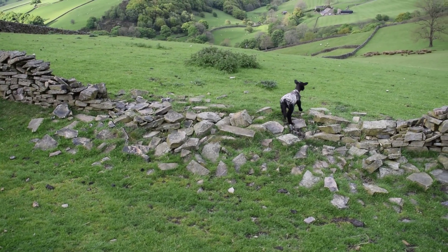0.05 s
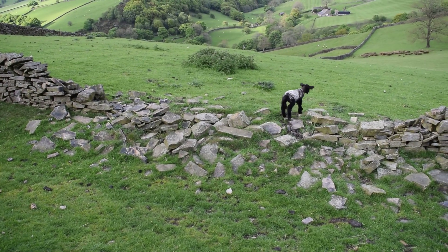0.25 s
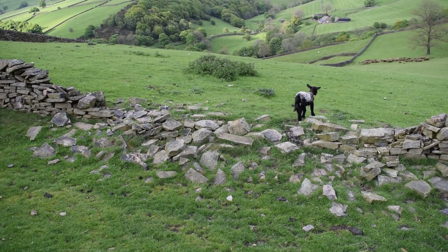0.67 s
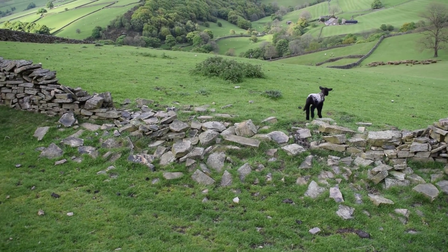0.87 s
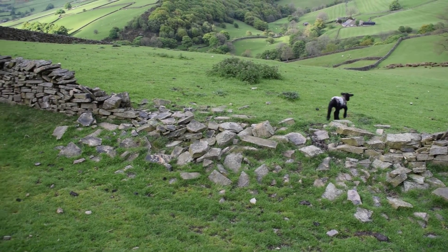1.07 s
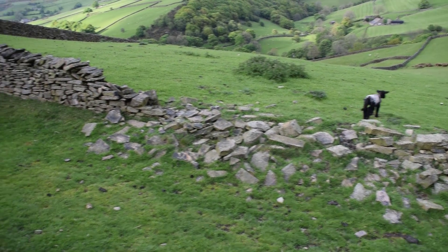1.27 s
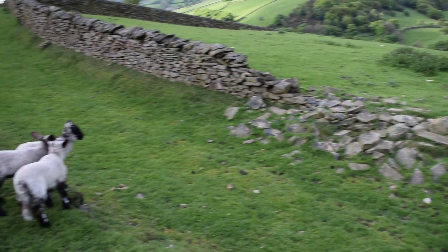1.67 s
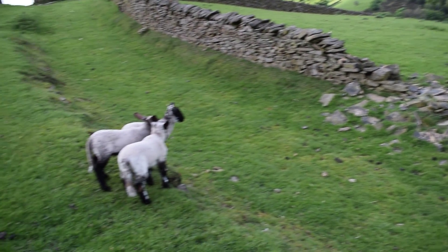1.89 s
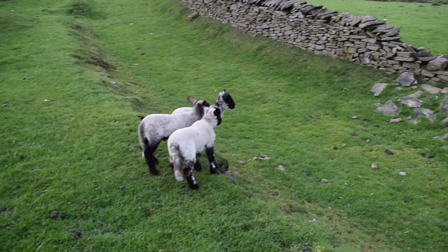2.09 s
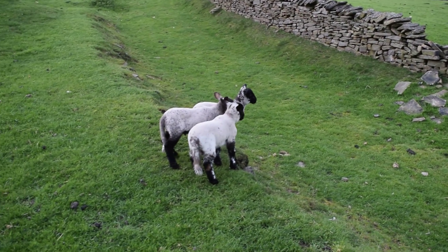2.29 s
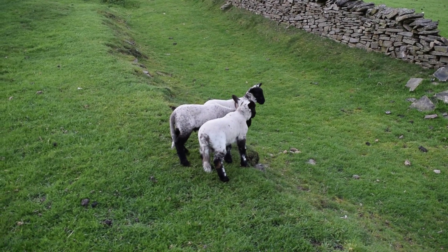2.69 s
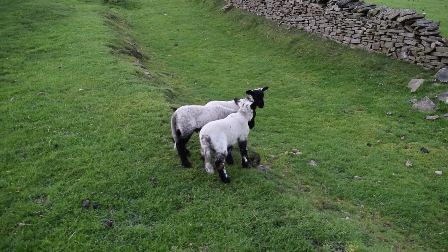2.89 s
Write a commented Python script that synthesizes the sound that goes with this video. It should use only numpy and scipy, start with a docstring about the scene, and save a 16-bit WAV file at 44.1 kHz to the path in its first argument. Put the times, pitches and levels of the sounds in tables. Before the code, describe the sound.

A lamb bleats close by, then sheep call farther off, as wind buffets the microphone.

```python
"""A lamb bleats close by on a windy hill pasture; a ewe and a second lamb call from farther off.
Each voice is a source and a filter: vocal-fold pulses and breath noise, shaped by throat resonances.
Turbulent pressure rumbles and thumps on the microphone and overloads it now and then.
Under a soft hiss of air, grass rustles, a bird whistles once and the camera case clicks in the hand.
A low hum rises at the end."""
import sys
import numpy as np
from scipy import signal
from scipy.fft import rfft, irfft
from scipy.io import wavfile
from scipy.ndimage import uniform_filter1d

SR = 44100
rng = np.random.default_rng(int(sys.argv[2]) if len(sys.argv) > 2 else 0)


def int16_out(signal):
    """Quantize to a 16-bit WAV file."""
    q = np.round(np.clip(np.atleast_2d(signal).T, -1, 1) * 32767)
    wavfile.write(sys.argv[1], SR, q.astype(np.int16))


N = 134505
TIME = np.arange(N) / SR
TOP_HZ = 15900  # upper limit of the voices' harmonics and of the passband


def undb(db):
    """Amplitude ratio of a level in decibels."""
    return 10 ** (np.asarray(db) / 20)


def unit(x):
    """Normalisation to rms 1."""
    return x / np.sqrt(np.mean(x ** 2) + 1e-20)


def curve(table, column=1):
    """Linear interpolation of one column in time."""
    rows = np.array(table)
    return np.interp(TIME, rows[:, 0], rows[:, column])


def envelope(table, column=2):
    """Gain from a level column, with exponential decay outside the table's time span."""
    outside = np.maximum(table[0][0] - TIME, 0) + np.maximum(TIME - table[-1][0], 0)
    return undb(curve(table, column)) * np.exp(-outside / .01)


def colour(x, points):
    """Zero-phase filtering through (f/Hz, gain/dB) points."""
    hz, db = np.array(points).T
    f = np.arange(N + 1) * SR / (2 * N)
    gain = undb(np.interp(np.log(f + 1), np.log(hz), db))
    return irfft(rfft(x, 2 * N) * gain)[:N]


def walk(rate_hz):
    """Smooth random modulation of rms 1."""
    k = max(int(SR / rate_hz), 2)
    steps = np.repeat(rng.standard_normal(N // k + 1), k)
    return unit(uniform_filter1d(uniform_filter1d(steps, k), k)[:N])


def larynx(hz, jitter, rasp_db, shimmer=.2, mouth=lambda f: 1):
    """Phonation: nearly periodic vocal-fold pulses give harmonics, with a puff of air in every cycle."""
    phase = 2 * np.pi * np.cumsum(hz * (1 + jitter * walk(300))) / SR
    flutter, wobble = undb(2.4 * walk(49.95)), walk(110)
    pulses = np.zeros(N)
    for k in range(1, 35):  # random time shifts let each harmonic waver separately
        gain = mouth(k * hz) * (k * hz < TOP_HZ) * np.roll(flutter, rng.integers(N))
        offset = .57 * rng.standard_normal() + .059 * k * np.roll(wobble, rng.integers(N))
        pulses += gain * np.cos(k * phase + offset)
    puffs = unit(rng.standard_normal(N) * (1 + np.cos(phase)))
    return unit(pulses) * (1 + shimmer * walk(120)) + undb(rasp_db) * puffs


def bleat(voice, levels, splits_hz):
    """Time-varying filtering: low, middle and high bands swell separately as the mouth opens."""
    lowpasses = (signal.butter(8, hz, fs=SR, output='sos') for hz in splits_hz)
    low, low_mid = (signal.sosfiltfilt(sos, voice) for sos in lowpasses)
    bands = (low, low_mid - low, voice - low_mid)
    steady = (x / np.sqrt(uniform_filter1d(x ** 2, size=1200) + 1e-12) for x in bands)
    return sum(x * envelope(levels, column) for column, x in enumerate(steady, 1))


def formant(f, centre_hz, half_width_hz):
    """Resonance peak of Lorentzian shape and height 1."""
    return 1 / (1 + ((f - centre_hz) / half_width_hz) ** 2)


# The close bleat: t/s, low-band level/dB, middle-band level/dB, high-band level/dB
NEAR_LEVELS = [
    (0.0, -49, -51, -61), (0.036, -53.5, -53, -67), (0.076, -37.5, -46, -51.5), (0.124, -45, -43.5, -54),
    (0.148, -33.5, -34, -46), (0.2, -43.5, -37.5, -46.5), (0.218, -35, -42, -54.5),
    (0.232, -43.5, -39, -48.5), (0.266, -37.5, -44.5, -58.5), (0.28, -31.5, -36, -50.5),
    (0.322, -41, -43.5, -64), (0.358, -34.5, -42, -61.5), (0.374, -49.5, -44.5, -59.5),
    (0.388, -43, -49, -60), (0.402, -40.5, -43.5, -59.5), (0.412, -46.5, -55, -69.5),
    (0.432, -38, -45, -59), (0.45, -38, -48, -60.5), (0.468, -61.5, -59.5, -67.5),
    (0.48, -52.5, -61.5, -70.5)]
# Fundamental, mouth formant and upper throat formant: t/s, f/Hz
NEAR_PITCH = [(0.0, 338.6), (0.032, 342.1), (0.08, 357.9), (0.118, 332.0), (0.14, 353.6), (0.15, 370.7),
              (0.19, 353.1), (0.21, 367.4), (0.232, 354.0), (0.28, 370.9), (0.304, 354.8), (0.328, 363.0),
              (0.34, 374.9), (0.35, 367.6), (0.386, 322.0), (0.412, 350.0), (0.428, 360.8), (0.46, 319.8)]
MOUTH_FORMANT = [(0, 1790), (.08, 1840), (.11, 1490), (.15, 1620), (.19, 1690), (.24, 1400), (.33, 1420),
                 (.39, 1440), (.42, 1645), (.45, 1392)]
UPPER_FORMANT = [(0, 2880), (.07, 2900), (.1, 3850), (.14, 3900), (.17, 4250), (.2, 4040), (.225, 3300),
                 (.28, 3010), (.35, 2950), (.45, 3000)]
# Throat response: f/Hz, gain/dB
NEAR_THROAT = [(350, -1), (720, -8.5), (1090, 0), (1450, -5), (1800, -6.5), (2170, -9.5), (2520, -8),
               (2920, 3.5), (3280, -1), (3600, -4), (3980, -0.5), (4600, -10), (5200, -8), (5800, -17),
               (6500, -18.5), (8000, -23), (10500, -29), (12500, -42.5), (16000, -46.5)]


def near_lamb():
    """Source and filter: two moving formants shape the harmonics of a quavering bleat."""
    lower, upper = curve(MOUTH_FORMANT), curve(UPPER_FORMANT)
    mouth = lambda f: 1 + undb(14) * formant(f, lower, 190) + undb(-5) * formant(f, upper, 120)
    source = larynx(curve(NEAR_PITCH), jitter=.006, rasp_db=-16, shimmer=.18, mouth=mouth)
    return bleat(colour(source, NEAR_THROAT), NEAR_LEVELS, splits_hz=(2450, 4750))


def hillside(x, t60_s=.3, level_db=-18):
    """Scattering from the slope and stone walls adds a faint, exponentially decaying tail."""
    tail = rng.standard_normal(N) * np.exp(-np.log(1000) * TIME / t60_s) * (TIME > .012)
    return x + undb(level_db) * signal.fftconvolve(x, tail / np.linalg.norm(tail))[:N]


# Rumble envelope: t/s, level/dB
RUMBLE_LEVEL = [(0, -26.5), (.18, -33), (.28, -17.5), (.44, -24), (.6, -20.5), (.85, -23.5), (.95, -23),
                (1.1, -26.5), (1.27, -30.5), (1.42, -25), (1.49, -30.5), (1.56, -23.5), (1.8, -29.5),
                (2.05, -22.5), (2.35, -22), (2.55, -19.5), (2.63, -27), (2.78, -29), (2.85, -37.5),
                (3.05, -35)]
# Rumble spectrum: f/Hz, relative level/dB
RUMBLE_SPECTRUM = [(15, -32.5), (35, -3.5), (70, 4.5), (130, -2.5), (200, -12.5), (300, -29), (500, -34.5),
                   (1000, -50.5), (3000, -83.5)]


def wind_rumble(gust_db=3.2):
    """Turbulence around the microphone makes restless low-frequency pressure fluctuations."""
    gusts = rng.standard_normal(N) * undb(gust_db * walk(34.944))
    return unit(colour(gusts, RUMBLE_SPECTRUM)) * undb(curve(RUMBLE_LEVEL))


# Open-air spectrum: f/Hz, relative level/dB
AIR_SPECTRUM = [(100, -12), (300, -4.5), (600, -2.5), (950, -3.5), (1600, -11.5), (2300, -13.5),
                (4000, -20.5), (7000, -25.5), (10000, -29.5), (13000, -35), (15500, -41.5)]


def open_air(level_db=-55.5):
    """Broadband ambient noise, heard as a soft, almost steady hiss."""
    return unit(colour(rng.standard_normal(N), AIR_SPECTRUM)) * undb(level_db + .22 * walk(6))


# Eddy impacts: t/s, peak level/dB, churn half-length/s, cut-off f/Hz
EDDIES = [(0.248, -9, 0.0085, 161), (0.326, -3, 0.015, 292), (.333, 1, 0.0046, 230), (0.339, 5, 0.002, 530),
          (0.362, -11.5, 0.0083, 189), (.401, -12, 0.0028, 440), (.491, -4, 0.0051, 486),
          (.595, -9, 0.0027, 514), (0.604, 1, 0.0055, 278), (0.619, -6.5, 0.0051, 330),
          (.643, -6.5, 0.0041, 170), (.714, -12.5, 0.0051, 480), (0.745, -7, 0.015, 430),
          (0.851, -11, 0.0077, 205), (0.891, -14, 0.002, 362), (0.994, -1, 0.0038, 350),
          (1.026, -0.5, 0.012, 396), (1.037, 0.5, 0.011, 354), (1.062, -5, 0.014, 310),
          (1.086, -10, 0.0029, 246), (1.132, -13.5, 0.0029, 258), (1.173, -4, .005, 292),
          (1.19, -5, 0.013, 400), (1.308, -18.5, 0.0033, 226), (1.374, -4.5, 0.012, 382),
          (1.556, -6, 0.0077, 154), (1.594, -13.5, 0.013, 129), (1.714, -17.5, 0.004, 195),
          (1.786, -15.5, 0.0043, 220), (1.895, -10.5, 0.0057, 157), (1.942, -8.5, 0.013, 241),
          (2.134, -12, 0.0047, 343), (2.213, -11.5, 0.016, 184), (2.259, -8.5, 0.0091, 330),
          (2.299, -9.5, 0.0043, 170), (2.309, -4, 0.0018, 495), (2.316, -10, 0.0069, 330),
          (2.342, 0.5, 0.0034, 260), (2.362, -7, 0.024, 328.8), (2.386, -2, 0.0074, 588),
          (2.395, -8, 0.009, 275), (2.421, -9, .004, 330), (2.499, -16, 0.0026, 400),
          (2.542, -11.5, 0.0074, 400), (2.705, -13, 0.0032, 157), (2.759, -11, 0.0019, 238)]


def wind_thumps(low_cut_hz=82, churn_gain=.92):
    """An eddy striking the microphone is a pressure impulse in a short churn; faster ones are brighter."""
    size = 8192
    out = np.zeros(N + 2 * size)
    t = (np.arange(size) - size // 2) / SR
    f = np.arange(size // 2 + 1) * SR / size + 1
    for (at, db, length, hz), noise in zip(EDDIES, rng.standard_normal((len(EDDIES), size))):
        impulse = rfft(1. * (t == 0)) * np.exp(2j * np.pi * noise[0])  # random phase
        churn = noise * np.exp(-(t / length) ** 2)
        spectrum = impulse + churn_gain * rfft(churn / np.linalg.norm(churn))
        passband = f ** -.68 / np.hypot(1, (low_cut_hz / f) ** 2) / np.hypot(1, (f / hz) ** 3.69)
        pressure = irfft(spectrum * passband)
        start = int(at * SR) + size // 2
        out[start:start + size] += undb(db) * pressure / np.abs(pressure).max()
    return out[size:size + N]


# Swells of rustling: t/s, half-length/s, level/dB
GRASS_SWELLS = [(.6, 0.029, -68), (0.838, .05, -68.5), (1.05, .04, -70), (1.29, .04, -65),
                (1.412, 0.05, -68), (1.49, 0.019, -64)]
# Rustle spectrum: f/Hz, relative level/dB
GRASS_SPECTRUM = [(500, -30.5), (2000, -10), (4500, 1), (8000, -6.5), (12000, -6), (16000, -14.5)]


def grass():
    """Amplitude-modulated noise: grass rustles in brief Gaussian swells."""
    rustle = unit(colour(rng.standard_normal(N), GRASS_SPECTRUM)) * undb(1.9 * walk(290))
    swells = sum(undb(db) * np.exp(-((TIME - at) / length) ** 2) for at, length, db in GRASS_SWELLS)
    return rustle * swells


def bird(at_s=1.125, half_length_s=.048, hz=2200, level_db=-60.5):
    """A nearly pure tone with slight frequency modulation: one distant whistle."""
    whistle = np.sin(2 * np.pi * np.cumsum(hz * (1 + .006 * walk(62))) / SR)
    return undb(level_db) * whistle * np.exp(-((TIME - at_s) / half_length_s) ** 4)


# Handling taps: t/s, peak level/dB
TAPS = [(1.222, -40), (2.629, -22)]
# Modes of the case: f/Hz, relative level/dB, T60/s
CASE_MODES = [(1220, -4, 0.017), (2200, -2, 0.0083), (3300, -2.5, 0.0059), (4350, 4.5, 0.0054),
              (5400, -3.5, .006), (7800, -14, .004), (11600, -20.5, 0.0036)]


def camera_clicks():
    """Impulse response: small taps excite the damped modes of the plastic camera case."""
    ring = sum(undb(db) * np.sin(2 * np.pi * hz * TIME) * np.exp(-np.log(1000) * TIME / t60)
               for hz, db, t60 in CASE_MODES)
    taps = np.zeros(N)
    for at, db in TAPS:
        taps[int(at * SR)] = undb(db)
    return signal.fftconvolve(taps, ring / np.abs(ring).max())[:N]


# The ewe's call: t/s, fundamental f/Hz, level/dB
EWE_BLEAT = [(1.6, 163.7, -75), (1.66, 168.6, -57), (1.73, 175.9, -56), (1.82, 172.5, -54),
             (1.91, 171.8, -56.5), (1.97, 178.8, -54.5), (2.05, 179.4, -57.5), (2.12, 182.3, -55),
             (2.17, 162, -62.5)]
# Throat response: f/Hz, gain/dB
EWE_THROAT = [(170, -16.5), (600, -5), (900, -8), (1200, -10), (1600, 6), (1900, 3.5), (2250, 5),
              (2600, -17), (3500, -17), (5000, -30), (8000, -53)]


def ewe():
    """Breathy phonation: a distant, hoarser call an octave below the lambs."""
    source = larynx(curve(EWE_BLEAT), jitter=.005, rasp_db=-12)
    return unit(colour(source, EWE_THROAT)) * envelope(EWE_BLEAT)


# The far bleat: t/s, low-band level/dB, middle-band level/dB, high-band level/dB
FAR_LEVELS = [(1.81, -69, -67, -74), (1.88, -49.5, -54, -62), (1.98, -50, -54, -64.5),
              (2.06, -48, -56.5, -62), (2.15, -54, -57.5, -61.5), (2.22, -54, -51.5, -57.5),
              (2.28, -49.5, -52, -55.5), (2.4, -53, -56.5, -56.5), (2.46, -70.5, -59, -73.5)]
# Fundamental: t/s, f/Hz
FAR_PITCH = [(1.84, 296.1), (1.866, 333.2), (1.884, 342.9), (1.912, 335.4), (1.942, 346.0), (2.0, 347.0),
             (2.05, 357.0), (2.166, 349.6), (2.216, 357.1), (2.288, 345.0), (2.368, 341.3), (2.412, 327.3),
             (2.438, 314.6), (2.47, 291.8)]
# Throat response: f/Hz, gain/dB
FAR_THROAT = [(350, -22), (700, -9.5), (1050, 3), (1400, -8), (1750, -15), (2100, -20), (2450, -0.5),
              (2780, 2), (3150, -14), (3500, -14.5), (3900, -25.5), (5000, -39), (8000, -56)]


def far_lamb():
    """Source and filter with little breath noise: a clear, arching bleat, brighter in its second half."""
    source = larynx(curve(FAR_PITCH), jitter=.004, rasp_db=-21)
    return bleat(colour(source, FAR_THROAT), FAR_LEVELS, splits_hz=(2000, 2990))


# Rising hum: t/s, f/Hz, level/dB
HUM_GLIDE = [(2.86, 119.2, -38.5), (2.93, 138, -46), (3, 155.5, -37), (3.05, 179, -44)]


def hum():
    """Frequency modulation: a soft, low sinusoid wavers as it glides upward."""
    hz = curve(HUM_GLIDE) * (1 + .017 * walk(40.1))
    return unit(np.sin(2 * np.pi * np.cumsum(hz) / SR)) * envelope(HUM_GLIDE)


def scene():
    """Superposition of three sheep, wind, hum, pasture and handling in one channel."""
    sheep = hillside(near_lamb() + far_lamb() + ewe())
    mix = sheep + wind_thumps() + wind_rumble() + hum() + open_air() + grass() + bird() + camera_clicks()
    return mix[None]


def record(dry):
    """Overload and band limiting: the hardest thumps clip, then a low-pass cuts the top."""
    lowpass = signal.ellip(10, .1, 80, TOP_HZ, fs=SR, output='sos')
    return signal.sosfilt(lowpass, np.clip(dry, -1, 1))


dry = scene()
out = record(dry)
int16_out(out)
```